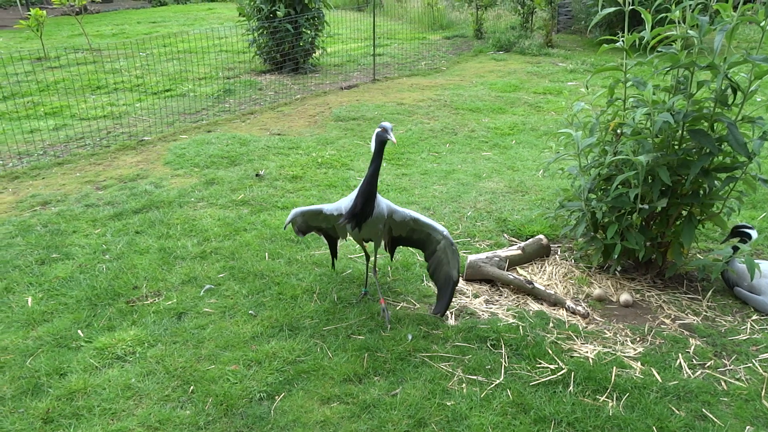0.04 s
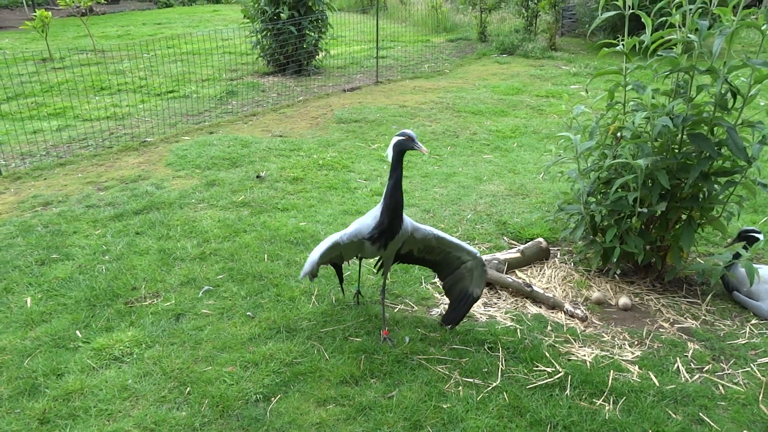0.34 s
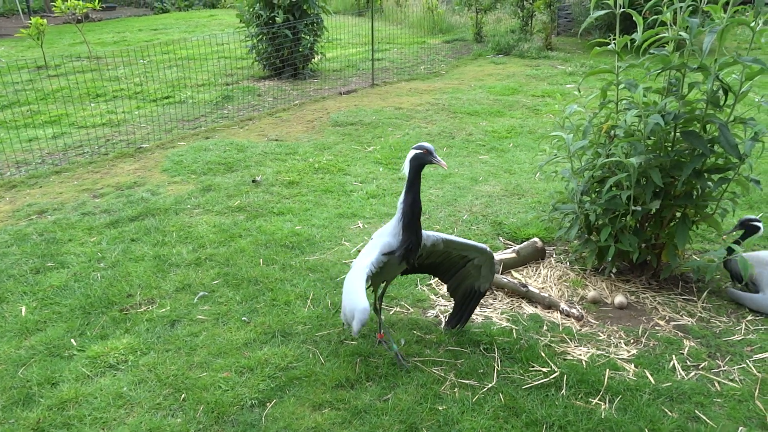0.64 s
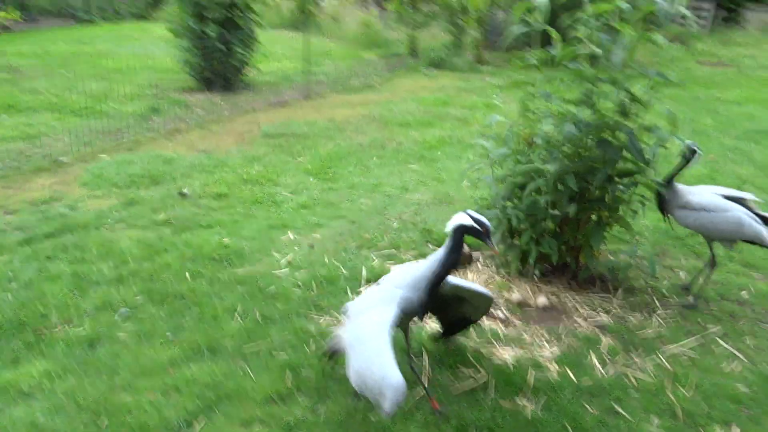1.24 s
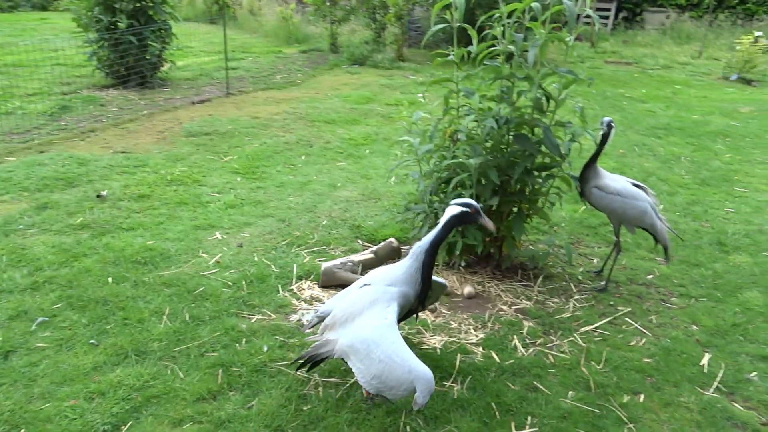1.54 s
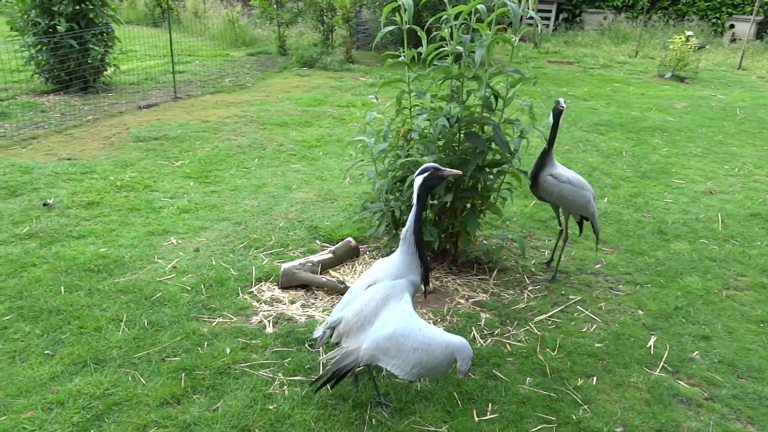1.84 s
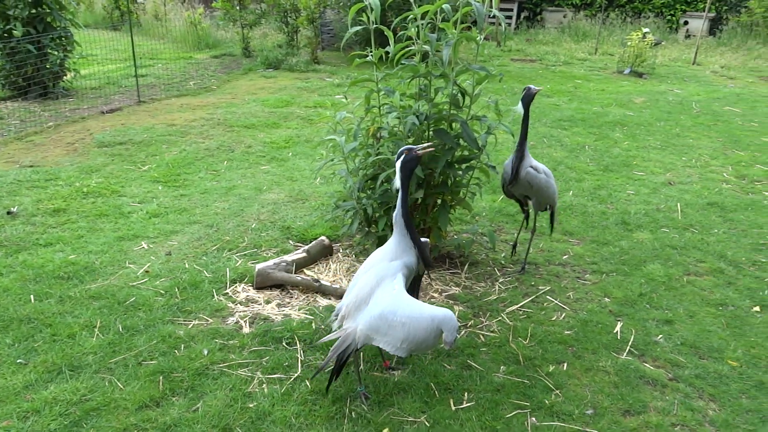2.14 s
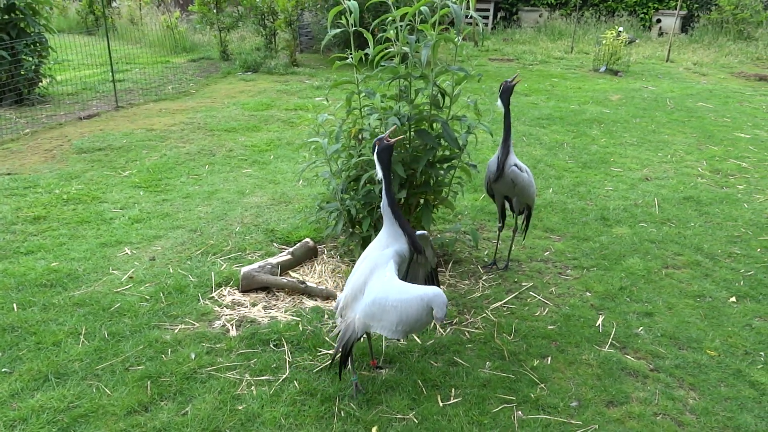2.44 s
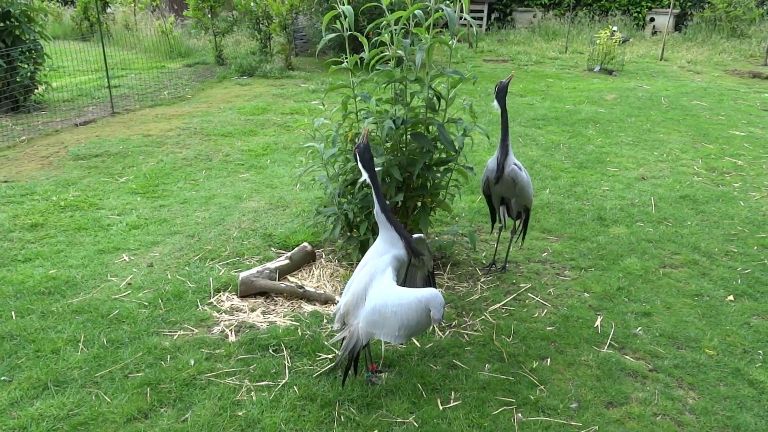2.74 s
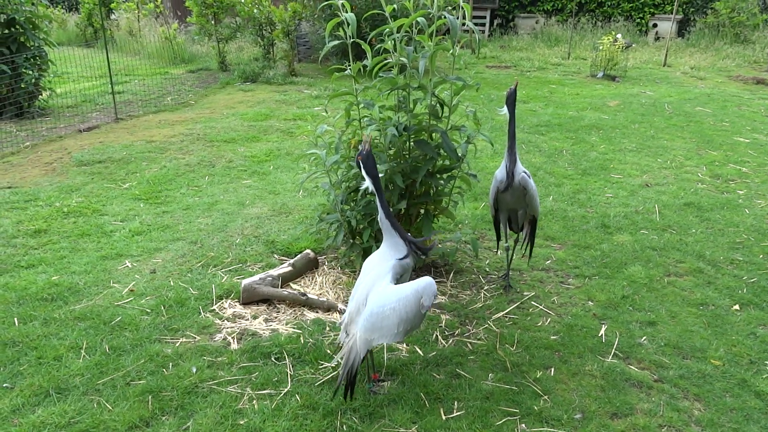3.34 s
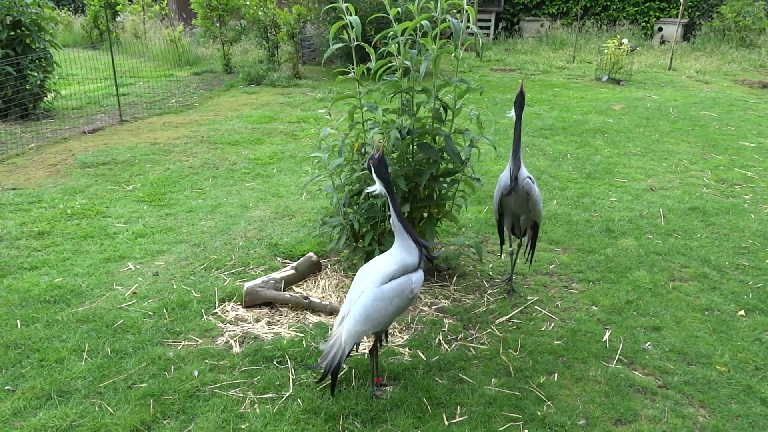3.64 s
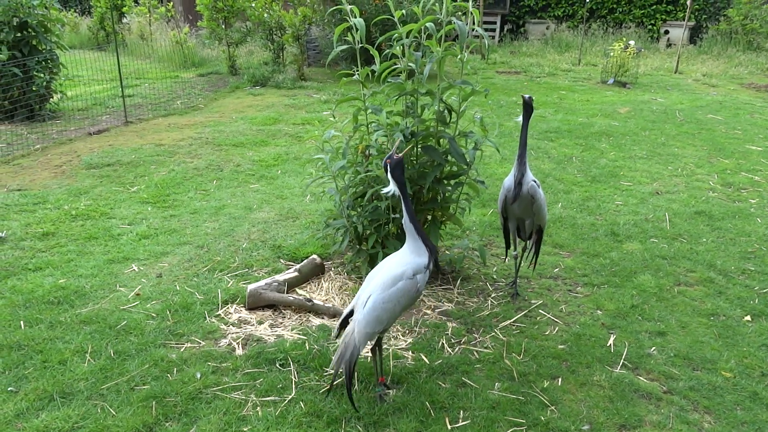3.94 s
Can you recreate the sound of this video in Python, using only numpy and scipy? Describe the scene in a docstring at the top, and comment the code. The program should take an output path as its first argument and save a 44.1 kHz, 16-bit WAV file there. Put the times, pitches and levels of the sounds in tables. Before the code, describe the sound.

Two cranes call a few metres away in a garden. Soft throaty clucks come during the first 1.3 seconds over a faint rumble and hiss, then a short purr swells. At about 1.6 seconds loud, harsh rattling calls burst out and repeat until the end at 4 seconds, with brief gaps near 2.3 and 2.8 and fast falling trills around 2.5 and 3.6. The calls echo slightly.

```python
"""A garden lawn with two cranes a few metres away: soft throaty clucks, a purr, then loud rattling calls.
Every rattle is a string of beats, each a few cycles of the voice near 1.2 kHz ringing in the windpipe.
When the voice is pushed, every cycle snaps shut and rasps through the throat and open bill.
The lawn, shrubs and fence answer, over a distant rumble and a faint hiss."""
import sys
import numpy as np
from scipy import signal
from scipy.fft import rfft, irfft, next_fast_len
from scipy.io import wavfile

SR = 44100
rng = np.random.default_rng(int(sys.argv[2]) if len(sys.argv) > 2 else 0)


def to_wav(sig):
    """Store sig (one row per channel, or 1-D mono) as 16-bit WAV at the path in sys.argv[1].

    Samples outside -1..1 are clipped; the rate is SR.
    """
    pcm = np.clip(np.atleast_2d(sig), -1, 1) * 32767
    pcm = np.round(pcm).astype(np.int16)
    wavfile.write(sys.argv[1], SR, pcm.T)  # frames by channels


N = 176400

# Colour the windpipe gives the tone. Each row: frequency in Hz, gain in dB.
WINDPIPE = [(100, -9.5), (450, -4.5), (650, -3.5), (850, 2.5), (1000, 0), (1300, 0.5), (1520, -2),
            (1750, -2.5), (2300, 3.5), (3000, 0.5), (4200, -2.5), (8000, -22), (14000, -35)]
# Colour the throat and open bill give the rasp. Each row: frequency in Hz, gain in dB.
THROAT = [(150, -34), (330, -19), (500, -23.5), (700, -10.5), (1200, -2), (1800, 2), (2100, -2),
          (2550, -0.5), (2900, -6.5), (3500, -4.5), (3900, -5), (4300, -3), (4700, -5.5), (5700, -0.5),
          (6400, 0.5), (7400, 3), (8400, -2), (9200, -4), (10500, -10.5), (12500, -19), (15500, -31)]
BEAT_GAP_S = .007  # between the beats of a roll
SOFT_TRIM_DB = -5  # on the tone of clucks and croaks


def calls():
    """Loud rattles: a rough tone passes the windpipe; snaps and turbulent air ring the throat and bill."""
    # Two fast trills. Each row: time in seconds, beats per second, pitch in Hz,
    # relative tone level in dB, relative rasp level in dB.
    first_trill = [(2.472, 149, 1296, -18.5, -23), (2.51, 147, 1413, -15, -20),
                   (2.555, 148, 1440, -14.5, -20.5), (2.59, 147, 1175, -15, -19.5),
                   (2.605, 111, 1051, -14, -23), (2.645, 105, 1038, -9, -26.5), (2.68, 98, 982, -14, -28.5),
                   (2.712, 79, 670, -43, -60)]
    second_trill = [(3.554, 136.8, 1230, -15, -21), (3.58, 147.3, 1403, -14.5, -19),
                    (3.61, 155.2, 1462, -16.5, -21), (3.645, 149.4, 1346, -15, -20),
                    (3.68, 145.8, 1196, -13.5, -21), (3.705, 139.9, 1193, -13.5, -20.5),
                    (3.726, 106.9, 1052, -10.5, -20.5)]
    flutter_hz, flutter_depth, hoarse_db = 897, .14, -7.5
    flutter = np.interp(np.arange(N) * flutter_hz / SR, np.arange(N), rng.standard_normal(N))
    turbulence = amp(hoarse_db) * rng.standard_normal(N)
    tone, snaps, air_power = rolls() + trill(first_trill) + trill(second_trill)
    rough_tone = tone * (1 + flutter_depth * flutter)
    rasp = snaps + np.sqrt(air_power) * turbulence
    throat_gain = np.sqrt(np.mean(amp(along(THROAT, np.fft.rfftfreq(SR, 1 / SR))) ** 2))
    return coloured(rough_tone, WINDPIPE) + coloured(rasp, THROAT) / throat_gain


def rolls():
    """Bursts of one to four loud beats that lose rasp and, when above the resting pitch, sag."""
    # Each row: start in seconds, number of beats, centre pitch in Hz,
    # relative tone level in dB, relative rasp level in dB.
    bursts = [(1.6192, 1, 1104, -12, -32.5), (1.6438, 1, 1137, -12.5, -23.5),
              (1.6659, 3, 1261, -16.0, -21.5), (1.6853, 1, 1183, -20, -29), (1.6902, 3, 1252, -18.0, -21.5),
              (1.711, 2, 1284, -16, -22), (1.7238, 2, 1170, -15, -22.5), (1.738, 3, 1296, -18.0, -21.5),
              (1.7625, 2, 1310, -15.5, -19.5), (1.775, 2, 1170, -19.5, -26), (1.789, 3, 1221, -17, -20.0),
              (1.812, 3, 1110, -15.5, -20.5), (1.836, 2, 1034, -15.5, -25), (1.87, 1, 960, -11.0, -26.5),
              (1.897, 2, 1050, -17.5, -24), (1.924, 2, 1120, -14, -20.5), (1.9511, 3, 1130, -18, -21.0),
              (1.9792, 3, 1077, -17, -23), (2.005, 3, 1113, -17.5, -19.5), (2.031, 3, 1106, -16.5, -21.0),
              (2.0522, 4, 1270, -14.5, -20.0), (2.077, 4, 1309, -14, -19), (2.1037, 4, 1352, -13, -19.0),
              (2.1307, 4, 1342, -15.0, -18.5), (2.158, 4, 1332, -13.5, -18.5),
              (2.184, 4, 1263, -14.5, -18.5), (2.3931, 2, 1142, -18.0, -22.5), (2.418, 3, 1145, -18, -20.5),
              (2.448, 4, 1303, -15.5, -17.5), (2.88, 2, 1103, -19, -22.5), (2.901, 3, 1140, -21.0, -19),
              (2.936, 2, 1155, -21.5, -18.5), (2.9569, 3, 1130, -18.5, -21), (2.979, 4, 1121, -19, -18.5),
              (3.019, 4, 1147, -19.0, -18.5), (3.046, 2, 1195, -20.5, -19.5),
              (3.0615, 3, 1215, -16.0, -18.5), (3.089, 4, 1198, -19.0, -20.5),
              (3.124, 4, 1178, -16.5, -19.5), (3.155, 4, 1126, -16.5, -19.5), (3.1873, 1, 963, -15, -23),
              (3.1962, 3, 1245, -15.5, -23), (3.2314, 2, 1239, -18.0, -20), (3.264, 2, 1170, -16.5, -21.5),
              (3.3002, 2, 1203, -15.0, -21.5), (3.337, 1, 1031, -11.5, -27.5),
              (3.449, 2, 1133, -18.0, -22.5), (3.4737, 2, 1200, -21.0, -19), (3.503, 2, 1227, -21, -19.5),
              (3.532, 3, 1200, -20.5, -20.5), (3.7341, 3, 993, -20, -26), (3.761, 2, 966, -16.5, -23.5),
              (3.79, 1, 939, -18.0, -23.5), (3.8169, 1, 954, -22.5, -49), (3.9721, 1, 1204, -13.0, -20.5),
              (3.99, 2, 1358, -13, -19.5)]
    rest_hz, sag, scatter_s = 1048, .99, .0008
    tone_trim_db, rasp_trim_db, fade_db_per_beat = -4.5, -2.5, .9
    layers = np.zeros((3, N))
    for start, count, hz, tone_db, rasp_db in bursts:
        for k in range(count):
            pitch = hz + sag * max(hz - rest_hz, 0) * (count - 1 - 2 * k) / count
            delay = k * BEAT_GAP_S + rng.normal(0, scatter_s) if k else 0
            faded_db = rasp_db + rasp_trim_db - fade_db_per_beat * k
            add(layers, start + delay, beat(pitch, tone_db + tone_trim_db, faded_db))
    return layers


def trill(rows):
    """An unbroken run of beats that slows and drops in pitch as the call ends."""
    tone_trim_db, rasp_trim_db, scatter_s = -6, -2.5, .00025
    layers = np.zeros((3, N))
    times, *curves = np.transpose(rows)
    start = times[0]
    while start <= times[-1]:
        rate, hz, tone_db, rasp_db = [np.interp(start, times, curve) for curve in curves]
        add(layers, rng.normal(start, scatter_s), beat(hz, tone_db + tone_trim_db, rasp_db + rasp_trim_db))
        start += 1 / rate
    return layers


def beat(hz, tone_db, rasp_db, stretch=1, croak=False):
    """One beat of the voice in three layers: a falling tone, a snap per cycle, the power of the air."""
    tone_rise_s, ring_s, rasp_rise_s, air_decay_s = .0018, .0077, .0015, .014
    droop_per_s, pitch_scatter, level_scatter_db = 11, .045, 1.3
    snap_count, snap_phase, jitter_cycles, snap_scatter_db = 12, .18, .05, 1
    t = np.arange(SR // 32) / SR
    age = t / stretch
    hz = hz * np.exp(rng.normal(0, pitch_scatter))
    cycles = np.cumsum(hz * np.exp(-droop_per_s * (t - tone_rise_s))) / SR

    # A slack, low voice adds a tone an octave below, which fades as the pitch rises.
    undertone_db = -9.5 if croak else -21.5 - .1 * max(hz - 890, 0)
    partials = [(.5, undertone_db), (1, 0), (2, -25.5), (3, -23 if croak else -28)]
    wave = sum(amp(db) * np.sin(2 * np.pi * ratio * cycles) for ratio, db in partials)
    windpipe_ring = .21 * (1 - np.exp(-age / tone_rise_s)) * np.exp(1 - age / ring_s)
    tone = (swell(age, tone_rise_s, shape=2.13) + windpipe_ring) * wave

    snap_cycles = np.arange(snap_count) + rng.normal(snap_phase, jitter_cycles, snap_count)
    snap_times = np.interp(snap_cycles, cycles, t)
    snap_sizes = swell(snap_times / stretch, rasp_rise_s, shape=1.33)
    snap_sizes *= amp(rng.normal(0, snap_scatter_db, snap_count))
    snaps = np.bincount(np.round(snap_times * SR).astype(int), snap_sizes, len(t))
    air = (1 - np.exp(-t / rasp_rise_s)) * np.exp(-t / air_decay_s)

    gap_gain = np.sqrt(BEAT_GAP_S * SR / len(t))  # each beat carries one gap's worth of energy
    tone_gain, rasp_gain = gap_gain * amp(rng.normal([tone_db, rasp_db], level_scatter_db))
    return np.array([tone_gain * unit(tone), rasp_gain * unit(snaps), (rasp_gain * unit(air)) ** 2])


def squawk():
    """The voice briefly holds one pitch: even snaps buzz through the throat."""
    start_s, length_s, hz = 2.5, .0063, 1089.5
    snap_times = np.arange(0, length_s, 1 / hz)
    snaps = np.bincount(np.round(snap_times * SR).astype(int), np.sin(np.pi * snap_times / length_s))
    track = np.zeros(N)
    add(track, start_s, amp(-22) * unit(snaps))
    return coloured(track, THROAT)


def purr():
    """A swelling row of hollow croaks leads into the first call as the bill starts to open."""
    # Each row: start in seconds, pitch in Hz, relative level in dB.
    croaks = [(1.318, 944, -31), (1.359, 947, -26.5), (1.4, 962, -26.5), (1.4421, 936, -22.5),
              (1.4837, 910, -20.5), (1.526, 962, -24), (1.5688, 940, -24.5)]
    layers = np.zeros((3, N))
    for start, hz, db in croaks:
        add(layers, start, beat(hz, db + SOFT_TRIM_DB, rasp_db=db - 25, croak=True))
    tone, snaps, _ = layers
    return coloured(tone, WINDPIPE) + coloured(snaps, THROAT)


def clucks():
    """Single quiet beats through a shut bill; the weakest shrink to mere ticks."""
    # Each row: start in seconds, pitch in Hz, relative level in dB.
    soft_clucks = [(.026, 1000, -45.5), (0.052, 980, -43), (.082, 980, -45), (0.751, 1010, -29.5),
                   (.769, 963, -26), (.7995, 987, -22), (.828, 920, -39), (.98, 990, -43),
                   (1.006, 1040, -39.5), (1.031, 1030, -41), (1.058, 1040, -41), (1.082, 1000, -42),
                   (1.11, 1010, -44), (1.189, 1000, -43), (1.214, 1050, -38), (1.231, 990, -36),
                   (1.263, 1050, -35), (1.277, 930, -37.5)]
    # One sharp cluck. Its row: start in seconds, pitch in Hz, relative tone and rasp levels in dB.
    warning_cluck = [(0.3462, 1014, -31.5, -34.5)]
    # Colour of the rasp with the bill shut. Each row: frequency in Hz, gain in dB.
    shut_bill = [(200, -19), (500, 17), (800, 4), (1400, -1), (1700, -15), (2300, 8.5), (3300, -6),
                 (4500, 0.5), (7000, -8), (10000, -19), (15000, -40)]
    full_db, full_stretch, tick_stretch = -31, .89, .32
    layers = np.zeros((3, N))
    for start, hz, db in soft_clucks:
        stretch = np.clip(full_stretch * np.exp(db - full_db), tick_stretch, full_stretch)
        add(layers, start, beat(hz, db + SOFT_TRIM_DB, rasp_db=db - 26, stretch=stretch))
    for start, hz, tone_db, rasp_db in warning_cluck:
        add(layers, start, beat(hz, tone_db + SOFT_TRIM_DB, rasp_db, stretch=.42))
    tone, snaps, _ = layers
    return coloured(tone, WINDPIPE) + coloured(snaps, shut_bill)


def garden(voice):
    """Quick scatter from lawn and shrubs, a dying tail, and a later return from the fence."""
    # Length of the tail. Each row: frequency in Hz, seconds to fall by 60 dB.
    decay_times = [(300, 0.29), (1300, 0.83), (3000, 0.51), (7000, 0.55), (14000, 0.31)]
    # Colour of the tail. Each row: frequency in Hz, gain in dB.
    tail_colour = [(200, 8.5), (700, -8.5), (1000, -11.5), (1450, 7), (1900, -3.5), (2700, 2), (4000, 3.5),
                   (8000, -4.5), (14000, -2)]
    tail_db, scatter_db, fence_db, fence_s = -11.5, -8, -22, .07
    hz, frame_times, spectrum = signal.stft(rng.standard_normal((2, SR)), SR, nperseg=256)
    decay = amp(-60 * frame_times / along(decay_times, hz)[:, None])
    tail = signal.istft(spectrum * decay, SR, nperseg=256)[1]
    tail = coloured(tail / np.linalg.norm(tail[0]), tail_colour)
    t = np.arange(tail.shape[1]) / SR
    scatter = rng.standard_normal(tail.shape) * swell(t, rise_s=.0027, shape=.49)
    answer = amp(tail_db) * tail + amp(scatter_db) * scatter / np.linalg.norm(scatter[0])
    add(answer, fence_s, amp(fence_db) * tail[::-1])  # the two tails swap channels
    return spread(signal.fftconvolve(voice[None], answer, axes=1)[:, :N])


def background():
    """Distant rumble and a faint airy hiss, both sinking away during the calls."""
    # Each row: time in seconds, rumble level in dB, hiss level in dB.
    fader_moves = [(0, -54, -54.5), (.3, -51.5, -55.5), (.9, -50.5, -54.5), (1.25, -49, -52.5),
                   (1.6, -49.5, -54.5), (1.68, -62, -46.5), (2.6, -66, -63), (3.3, -70.5, -61),
                   (4, -66, -75)]
    # Colours of the two beds. Each row: frequency in Hz, gain in dB.
    rumble_colour = [(25, -31), (60, -8), (100, -8), (140, 5), (175, -1), (240, -5), (350, -10),
                     (550, -21.5), (1200, -49.5)]
    hiss_colour = [(200, -6.5), (500, -2.5), (750, -1.5), (980, 0.5), (1300, -8.5), (1800, -10.5),
                   (2400, -11.5), (3500, -12.5), (5000, -13.5), (6500, -9.5), (8400, -10), (10000, -18.5),
                   (11500, -30), (13000, -57), (15500, -62)]
    times, rumble_db, hiss_db = np.transpose(fader_moves)
    beds = np.zeros((2, N))
    for colour, db in (rumble_colour, rumble_db), (hiss_colour, hiss_db):
        noise = unit(coloured(rng.standard_normal((2, N)), colour))
        beds += noise * amp(np.interp(np.arange(N) / SR, times, db))
    return spread(beds)


def spread(pair):
    """Two unrelated signals as mid and side: a narrow image that opens in the highest treble."""
    # Each row: frequency in Hz, gain of the side signal in dB.
    width = [(100, -30.5), (1000, -13), (2500, -20.5), (5000, -21), (9000, -15), (14000, 3)]
    mid, side = pair[0], coloured(pair[1], width)
    return np.array([mid + side, mid - side])


def amp(db):
    """Decibels to gain."""
    return 10 ** (np.asarray(db) / 20)


def unit(x):
    """Scale to rms 1."""
    return x / np.sqrt(np.mean(x ** 2) + 1e-20)


def swell(t, rise_s, shape):
    """A hump that peaks at 1 after rise_s; a higher shape narrows it."""
    return (t / rise_s * np.exp(1 - t / rise_s)) ** shape


def along(points, hz):
    """Read a curve of (Hz, value) points on a log frequency axis."""
    freqs, values = np.transpose(points)
    return np.interp(np.log(hz + 1), np.log(freqs + 1), values)


def coloured(x, points):
    """Minimum-phase equaliser with the given (Hz, dB) shape."""
    m = 8192
    cepstrum = irfft(np.log(amp(along(points, np.fft.rfftfreq(m, 1 / SR)))), m)
    cepstrum[1:m // 2] *= 2
    cepstrum[m // 2 + 1:] = 0
    impulse = irfft(np.exp(rfft(cepstrum)))[:m // 2]
    size = next_fast_len(x.shape[-1] + m)
    return irfft(rfft(x, size) * rfft(impulse, size), size)[..., :x.shape[-1]]


def add(track, start_s, x):
    """Mix x into the track at start_s."""
    i = max(int(round(start_s * SR)), 0)
    part = track[..., i:i + x.shape[-1]]
    part += x[..., :part.shape[-1]]


def scene():
    """The birds almost straight ahead, the garden around them."""
    voice = clucks() + purr() + calls() + squawk()
    pan = amp([[-.15], [.15]])
    return voice * pan + garden(voice) + background()


def record(dry):
    """The highest peaks are rounded off and the very top of the treble is cut."""
    knee, top_hz = 3.3, 15800
    rounded = dry / (1 + np.abs(dry) ** knee) ** (1 / knee)
    size = next_fast_len(N + SR // 2)
    passband = np.fft.rfftfreq(size, 1 / SR) < top_hz
    return irfft(rfft(rounded, size) * passband, size)[:, :N]


dry = scene()
out = record(dry)
to_wav(out)
```